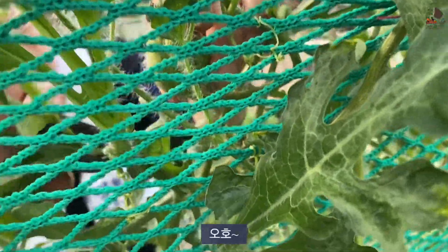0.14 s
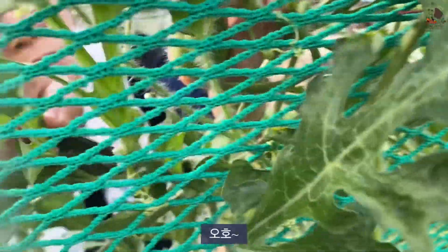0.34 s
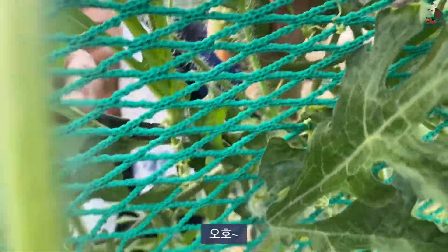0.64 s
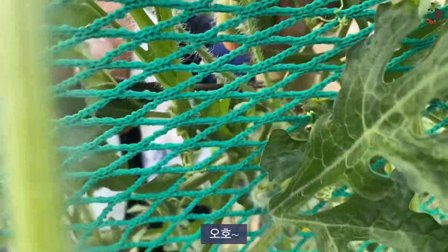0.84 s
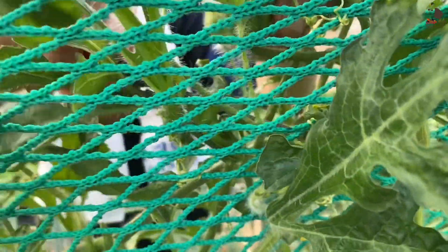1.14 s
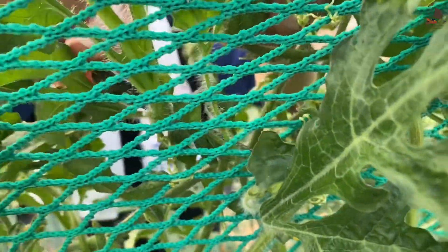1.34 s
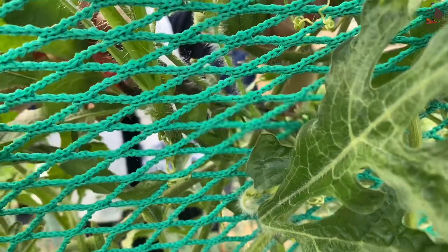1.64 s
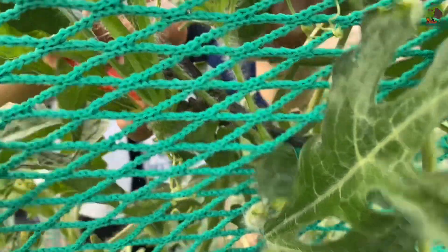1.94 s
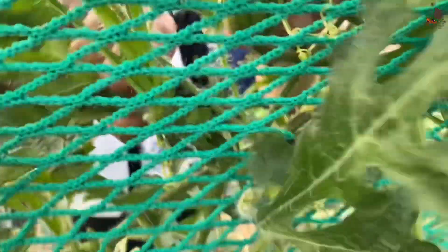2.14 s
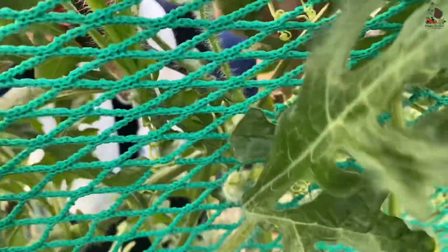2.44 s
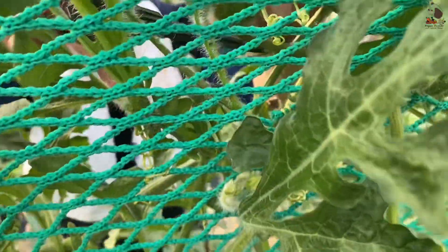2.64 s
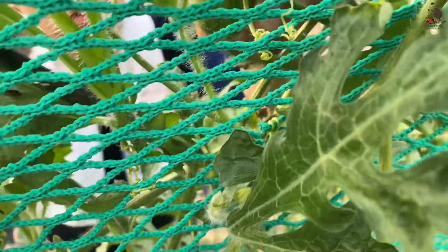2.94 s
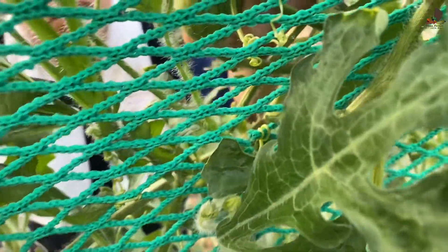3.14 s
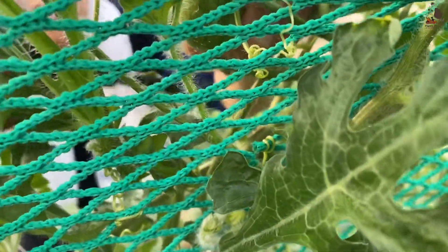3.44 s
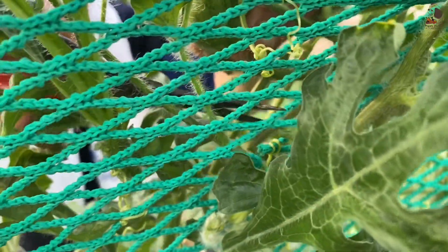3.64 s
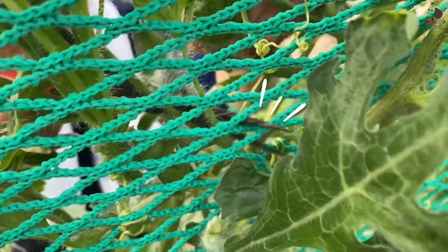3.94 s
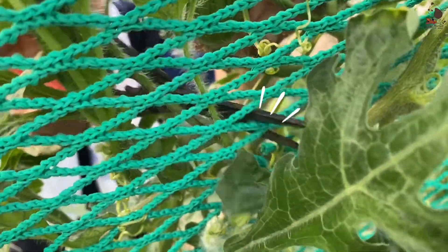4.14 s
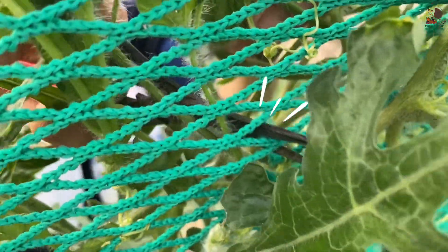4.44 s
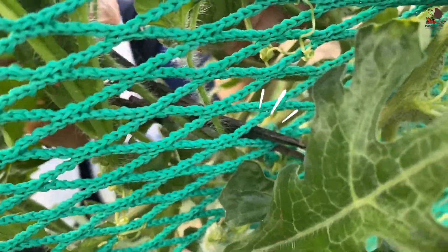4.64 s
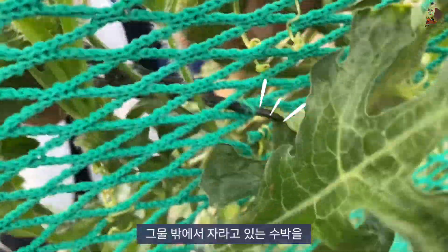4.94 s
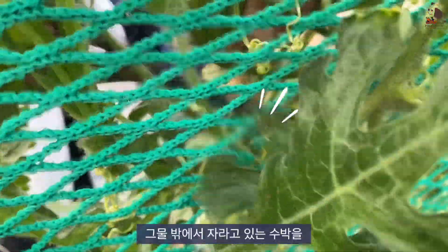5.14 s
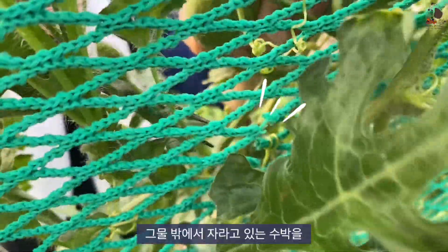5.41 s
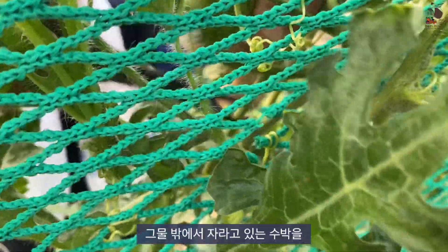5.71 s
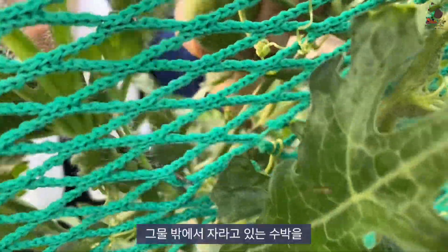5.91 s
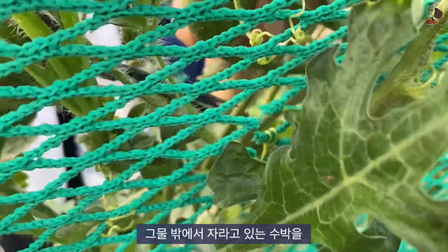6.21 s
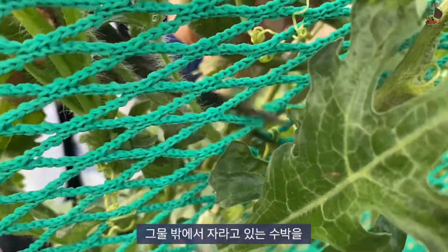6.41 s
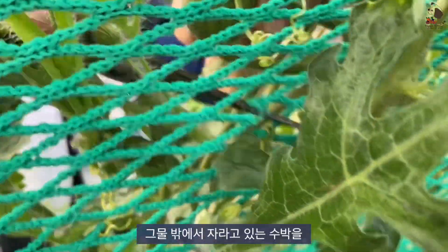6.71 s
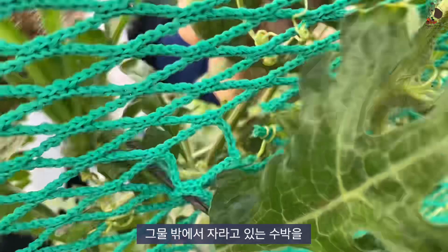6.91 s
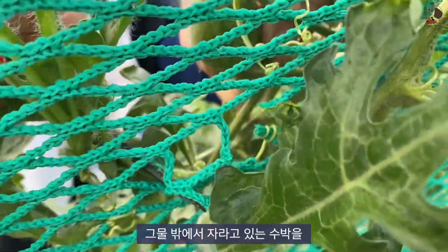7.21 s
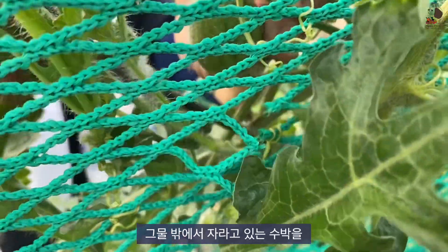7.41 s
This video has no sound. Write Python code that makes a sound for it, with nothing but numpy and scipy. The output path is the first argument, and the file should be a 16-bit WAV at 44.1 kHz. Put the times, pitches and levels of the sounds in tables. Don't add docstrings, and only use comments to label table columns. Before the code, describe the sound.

Close dry rustling in a netted hedge, with one crisp blade snip, a slowed heavier cut, small snaps and far bird chips.

```python
import sys
import numpy as np
from scipy import signal
from scipy.fft import rfft, irfft, next_fast_len
from scipy.io import wavfile
from scipy.ndimage import uniform_filter1d, minimum_filter1d

SR = 44100
rng = np.random.default_rng(int(sys.argv[2]) if len(sys.argv) > 2 else 0)


def boost_factor(decibels):
    exponent = np.asarray(decibels, float) / 20
    return 10 ** exponent


def to_wav(sig):
    pcm = np.clip(np.atleast_2d(sig), -1, 1) * 32767
    pcm = np.round(pcm).astype(np.int16)
    wavfile.write(sys.argv[1], SR, pcm.T)


N = 333611
FFT_SIZE = next_fast_len(N)
BIN_HZ = np.fft.rfftfreq(FFT_SIZE, 1 / SR)
TOP_HZ = 19500

# start, end in seconds.
SLOW_S = (3.788, 5.687)


def action_time(s):
    return s - (np.clip(s, *SLOW_S) - SLOW_S[0]) / 2


def speed_up(s):
    return 2 if SLOW_S[0] < s < SLOW_S[1] else 1


def curves(table):
    s, *columns = np.transpose(table)
    return [np.interp(np.arange(N) / SR, action_time(s), c) for c in columns]


def over_hz(table):
    hz, value = np.transpose(table)
    return np.interp(np.log(BIN_HZ + 1), np.log(hz + 1), value)


def shape(x, gain):
    return irfft(rfft(x, FFT_SIZE) * gain, FFT_SIZE)[..., :N]


def band(lo_hz, hi_hz, soft_hz):
    return (np.tanh((BIN_HZ - lo_hz) / soft_hz) - np.tanh((BIN_HZ - hi_hz) / soft_hz)) / 2


def unit(x):
    return x / np.sqrt(np.mean(x ** 2))


def smooth_twice(x, width):
    return uniform_filter1d(uniform_filter1d(x, width), width)


def walk(rate_hz):
    hold = int(SR / rate_hz)
    levels = np.repeat(rng.standard_normal(N // hold + 1), hold)
    return unit(smooth_twice(levels, hold)[:N])


# Hz, radians the left port leads.
PORTS_LEAD = [(0, 0), (450, .8), (750, 3), (1200, 1.5), (3270, 1.5), (4200, 0), (6500, .7), (7400, -.4),
              (8100, -2.6), (10400, -6.2), (20000, -21.8)]


def port_turn():
    return np.exp(.5j * np.interp(BIN_HZ, *np.transpose(PORTS_LEAD)))


def ports(x, pan_db):
    turn = port_turn()
    pan_db = pan_db - 0.64 * np.log2(np.clip(BIN_HZ, 2500, 10000) / 2500)
    return shape(x, np.array([turn * boost_factor(pan_db / 2), boost_factor(-pan_db / 2) / turn]))


# peak in seconds, level in dB, swell and fade in
# seconds per 10 dB, brightness in dB.
STROKES = [(0.0, -63, 0.125, 0.89, -1), (.332, -49.5, 0.093, 0.021, 0),
           (.41, -51.5, 0.032, 0.044, -3.5), (.604, -59, 0.098, 0.027, 0),
           (.688, -53.5, 0.049, 0.13, 2.5), (.95, -67, 0.46, 0.26, -8),
           (1.096, -57.5, 0.15, 0.044, -1), (1.248, -49, 0.041, 0.056, -0.5),
           (1.456, -57.5, 0.082, 0.11, -0.5), (1.588, -60, 0.027, 0.7, -3.5),
           (1.872, -53, 0.04, 0.05, 1), (2.008, -56, 0.0062, 0.048, 2),
           (2.116, -59, 0.053, 0.057, 1), (2.318, -54.5, 0.067, 0.1, -2),
           (2.478, -65, 0.088, 0.15, 0), (2.759, -60, 0.0226, 0.11, -4),
           (2.888, -58, 0.05, 1, -0.5), (3.052, -65, 0.2, 0.12, 1),
           (3.416, -52.5, 0.023, 0.14, 1.5), (3.554, -57, 0.44, 0.027, 0.5),
           (3.688, -52.5, 0.006, 0.062, 0), (3.801, -59.5, 0.011, 0.061, 2.5),
           (3.954, -57, 0.031, 0.31, -0.5), (4.112, -49, 0.083, 0.033, -0.5),
                   (4.208, -66, 0.025, 0.023, -12.5), (4.388, -47.5, 0.032, 0.07, 2.5),
                   (4.616, -46, 0.027, 0.13, 0), (4.718, -47, 0.22, 0.11, 0.5),
                   (5.029, -49, 0.084, 0.14, 0.5), (5.13, -48.5, 0.14, 0.11, -2.5),
                   (5.272, -54, .03, 0.12, -2.5), (5.614, -57, 0.096, 0.21, 1),
                   (5.804, -58, 0.12, 0.38, -2.5), (5.875, -47, 0.044, 0.027, -4),
                   (6.104, -56, 0.11, 0.0095, 7), (6.373, -99, 0.036, 0.18, -9),
                   (6.543, -54, 0.15, 0.146, -0.5), (6.61, -49.5, 0.0876, 0.2, 0.5),
                   (6.831, -46.5, 0.015, 0.0866, -4.5), (6.9, -52.5, 0.036, 0.098, 4),
                   (6.47, -53.5, 0.021, .1, -2), (7.1, -60.5, 0.085, 0.44, -1),
                   (7.312, -55, 0.072, 0.28, 0.5), (7.56, -61, 0.24, .1, -2)]
# body, hiss and air of the rub in dB.
REST_DB = (-79.5, -88, -94)
BODY_DB, AIR_DB = -5, 0
BODY_PER_BRIGHT, AIR_PER_BRIGHT = -1.2, 0.72


def strokes():
    t = np.arange(N) / SR
    power = boost_factor(2 * np.array(REST_DB))[:, None] + np.zeros(N)
    for s, db, swell_s, fade_s, bright_db in STROKES:
        late_s = (t - action_time(s)) * speed_up(s)
        shape_db = -10 * np.where(late_s < 0, -late_s / max(swell_s, 1e-3), late_s / max(fade_s, 1e-3))
        body_db = BODY_DB + BODY_PER_BRIGHT * bright_db
        air_db = AIR_DB + AIR_PER_BRIGHT * bright_db
        ranges_db = db + np.array([body_db, 0, air_db])
        power = power + boost_factor(2 * ranges_db)[:, None] * boost_factor(2 * np.maximum(shape_db, -100))
    return 10 * np.log10(power)


def crackle(per_s, spread_db, tail_s):
    sizes = boost_factor(spread_db * np.minimum(rng.exponential(size=N), 2.6))
    clicks = (rng.random(N) < per_s / SR) * sizes
    tail = np.exp(-np.arange(400) / (tail_s * SR))
    return unit(signal.fftconvolve(clicks, tail)[:N] * rng.standard_normal(N))


# Hz, density in dB per Hz.
RUB_COLOUR = [(350, -5.5), (700, -7), (1000, -5), (1200, -8), (1700, -10), (2300, -4.5), (2900, -4),
              (3600, -8.5), (4400, -6), (5500, -10), (7700, -3.5), (9000, -9), (11500, -1), (15000, -5),
              (19000, -8), (19900, -16)]


def rubbing():
    edges_hz = [(750, 2500), (2500, 9000), (9000, 20000)]
    shared = crackle(900., spread_db=4.0, tail_s=.0008)
    out = 0
    for (lo_hz, hi_hz), db in zip(edges_hz, strokes()):
        local = crackle(600., spread_db=4.0, tail_s=.0015)
        close = ports(shared + .7 * local, pan_db=1.2)
        hiss = boost_factor(4.4 * walk(40)) * rng.standard_normal((2, N))
        mix = shape(0.5 * close + .5 * hiss, boost_factor(over_hz(RUB_COLOUR)))
        steps_hz = np.geomspace(lo_hz, hi_hz, num=7)
        patches = 0
        for a, b in zip(steps_hz, steps_hz[1:]):
            patches = patches + shape(mix, band(a, b, a / 20)) * boost_factor(2.0 * walk(14))
        out = out + unit(patches) * boost_factor(db)
    return out


def bursts(events):
    crack, ring = np.zeros(N), np.zeros(N)
    t = np.arange(-400, 3000) / SR
    for s, db, hz, ring_db, t60_s, rise_s in events:
        k = speed_up(s)
        rise_s, t60_s = max(rise_s, 1e-4) / k, max(t60_s, 2e-3) / k
        fall = np.exp(-np.log(1000) * np.maximum(t, 0) / t60_s)
        envelope = np.where(t < 0, np.exp(t / rise_s), fall)
        at = max(int(action_time(s) * SR) - 400, 0)
        noise = rng.standard_normal((2, len(t)))
        waver = np.cumsum(uniform_filter1d(noise[1], size=24)) * 0.21 * min(hz * k / 1500, 1)
        size = boost_factor(db) / (1 + boost_factor(ring_db))
        crack[at:at + len(t)] += size * noise[0] * envelope * (0.56 + .5 * envelope ** 4)
        ring[at:at + len(t)] += size * boost_factor(ring_db) * envelope * np.sin(2 * np.pi * hz * k * t + waver)
    crack = shape(crack, boost_factor(over_hz(RUB_COLOUR) + 7.5) * band(900, TOP_HZ, 150.))
    tail = rng.standard_normal((2, 2500)) * np.exp(-np.arange(2500) / (.006 * SR))
    scatter = np.array([signal.fftconvolve(crack + ring, side)[:N] for side in tail])
    return ports(crack + ring, pan_db=1.0) + boost_factor(-33) * scatter


# start in seconds, peak in dB, ring in Hz, ring over crack in dB, t60 in seconds.
CUTS = [(2.0834, -39, 8160, 9, .021), (2.09, -28, 2430, 6, 0.028), (2.0948, -19, 1280, 6, 0.028),
        (2.095, -18.5, 4380, -4.5, 0.038), (2.0974, -24.5, 2850, 20, 0.04), (2.0999, -4.5, 8140, 10, 0.011),
        (2.1015, -19, 3535, 11, 0.027), (2.104, -27.5, 370, 40, 0.012), (2.114, -37, 2750, 6, 0.018),
        (2.109, -36, 3600, -2, 0.03), (4.644, -25.5, 1507, 10.5, 0.074), (4.649, -21, 1238, 16.5, 0.046),
        (4.6387, -29, 7300, -12, 0.072), (4.6453, -17.5, 2400, 1.5, 0.0667),
        (4.652, -21, 3470, -10.5, 0.036), (4.659, -33, 160, 41, 0.049), (4.672, -29.5, 340, 41, 0.066),
        (4.6507, -14.5, 7730, 18, 0.0096), (4.6532, -13, 2095, 22, 0.024), (4.6493, -16, 1500, -10, .008),
        (4.6682, -26, 3000, -8, .015), (4.658, -27, 1813, -21, 0.038), (4.6655, -20.5, 2003, 7, 0.02),
        (4.654, -24.5, 623, 26, 0.035), (4.6995, -28, 1910, 1.5, 0.034), (6.6648, -21, 7680, 7, 0.0076),
        (6.6643, -26.5, 2920, 7, 0.0093)]


def cuts():
    return bursts([(*row, 0.042 * row[-1]) for row in CUTS])


# start in seconds, peak in dB, ring in Hz, ring over crack in dB.
SNAPS = [(0.083, -51, 4000, -14), (1.026, -45, 7000, -16.5), (0.412, -38, 2100, -14), (.417, -39, 4800, -6),
         (.709, -44, 4500, -10), (6.358, -46, 2800, 0), (6.507, -44, 6000, -10), (6.585, -40, 6500, -8),
         (6.648, -36, 2600, -5), (6.853, -40, 2200, -8), (.567, -46, 7400, -8.5), (1.8358, -38, 3030, -1),
         (2.0074, -50, 8050, -7), (2.0607, -42, 2620, -14), (2.295, -38, 3900, -3), (2.758, -39.5, 4700, 0),
         (2.962, -33, 4500, -1.5), (3.42, -32, 7010, 4), (3.116, -41, 7050, -5), (3.246, -45, 2300, -4),
         (3.527, -46, 6000, -10), (3.547, -45, 6960, -10), (3.4283, -35, 4330, -7), (3.7233, -43, 4460, -6),
         (6.4501, -37.5, 6700, -8), (6.5665, -41, 2450, 1), (6.597, -37, 2340, 2), (6.8233, -34, 4000, 2),
         (6.83, -32, 2920, 3), (6.6216, -27.5, 4100, -3), (6.7417, -40, 7000, -13), (7.059, -42, 6390, -3),
         (7.2514, -43, 7360, -18.5), (7.457, -41, 4550, -8)]
MORE_SNAPS = [(3.798, -38.5, 5600, 19), (3.8182, -35.5, 5300, -7), (3.964, -52, 3970, -22),
              (4.201, -44.5, 1157, -20), (4.3278, -35, 8200, -3), (4.318, -46, 2300, 0), (4.264, -47, 5500, -8),
              (4.273, -47, 3800, 0), (4.403, -33, 7700, 3), (4.415, -36, 8000, -3), (4.2537, -48, 7800, 8),
              (4.283, -48, 7500, 0), (4.313, -43, 7900, 4), (4.351, -39.5, 2960, -5), (4.4548, -50, 7170, -2),
              (4.358, -31, 4050, 7), (4.377, -28, 7860, 10), (4.392, -24.5, 8000, 13), (4.5524, -36, 2080, -17),
              (4.8896, -38.5, 3583, -6), (4.99, -54, 3360, -2), (5.018, -33.5, 3000, 0), (5.1155, -20, 7600, 3),
              (5.1551, -36, 5480, 4), (5.202, -48, 1687, -28.5), (5.224, -37.5, 2200, 4)]
TEARS = [(1.2296, -27, 6620, -13, 0.035), (1.2358, -38, 1470, 10, 0.067), (3.685, -41, 7300, -9, 0.045),
         (4.6975, -26.5, 3590, 3, 0.042), (5.857, -29, 3330, -7, 0.026), (5.8636, -33, 2550, -27, 0.038),
         (6.641, -32.5, 2230, -12.5, 0.11), (6.682, -34, 2200, -7, 0.055), (6.813, -35.5, 7460, -11, 0.075),
         (6.8332, -31.5, 7300, -17.5, 0.071), (7.2887, -44, 7900, -11.5, 0.24)]
SNAP_T60_S, MORE_SNAP_T60_S = 0.013, 0.0226


def snaps_tears():
    events = [(*row, SNAP_T60_S) for row in SNAPS] + [(*row, MORE_SNAP_T60_S) for row in MORE_SNAPS] + TEARS
    return bursts([(s + .001, *row, .0002) for s, *row in events])


# start in seconds, peak in dB, ring in Hz.
TAPS = [(0.084, -48, 760), (0.136, -47, 1300), (0.146, -42, 821), (0.175, -50, 2030), (0.196, -49, 1300),
        (.231, -51, 1500), (0.215, -46.5, 751), (0.252, -48, 1036), (0.269, -47, 1490), (0.294, -48, 1200),
        (0.333, -51, 1290), (0.448, -51, 1210), (0.473, -49, 1140), (0.498, -58, 1340), (0.593, -47, 930),
        (0.702, -40, 730), (1.054, -50, 1255), (1.116, -46.5, 1640), (1.169, -53, 1130),
        (1.231, -34.5, 1300), (3.035, -52, 1530), (3.556, -39, 800), (3.59, -51, 1510), (3.687, -40, 822),
        (4.299, -65.5, 1230), (5.859, -31, 814), (6.833, -46, 1770), (6.994, -34, 680)]


def taps():
    return bursts([(s + .001, db + 7, hz, 15, .007, .0001) for s, db, hz in TAPS])


# start in seconds, peak in dB, ring in Hz.
KNOCKS = [
    (0.15, -53, 470),
    (0.706, -48, 384),
    (0.725, -42, 364),
    (4.288, -52, 284),
    (6.534, -46.5, 248),
    (6.619, -51, 403),
]


def knocks():
    return bursts([(s, db + 5, hz, 30, .04, .001) for s, db, hz in KNOCKS])


# start in seconds, length in seconds, start Hz, end Hz, level in dB.
SCRAPES = [(.71, .07, 2100, 2200, -65), (.81, 0.05, 2700, 2700, -64), (0.808, .07, 2350, 2150, -67),
           (.9, 0.18, 2150, 2350, -66), (0.837, 0.087, 995, 890, -61), (.9, 0.13, 3760, 3840, -68),
           (1.06, .06, 3600, 3700, -70), (2.752, .03, 2310, 2200, -67), (2.836, 0.059, 2500, 2300, -65),
           (3.147, 0.077, 4300, 4000, -68), (3.19, 0.11, 2400, 2190, -63), (3.207, 0.21, 1950, 2000, -68),
           (3.401, 0.18, 4350, 4500, -64), (3.44, .12, 2310, 2200, -64), (6.53, 0.092, 2450, 2350, -59),
           (5.92, .07, 2300, 2200, -64), (.3, .03, 2500, 2500, -62), (.22, .08, 4400, 4300, -61.5),
           (2.267, 0.105, 4200, 4000, -69), (6.6, .06, 3000, 2800, -58), (6.582, 0.033, 6500, 6000, -57),
           (6.623, 0.08, 2300, 2400, -55), (6.189, .12, 3600, 3500, -73)]
SCRAPE_WIDTH = .1


def scrapes():
    out, grain = np.zeros(N), boost_factor(3.0 * walk(90))
    for s, length_s, start_hz, end_hz, db in SCRAPES:
        u = np.linspace(0, 1, int(length_s * SR))
        wide = int(SR / (2 * SCRAPE_WIDTH * start_hz))
        noise = rng.standard_normal((2, 10000))
        shake = smooth_twice(noise, wide)[:, :len(u)]
        turn = 2 * np.pi * np.cumsum(start_hz + (end_hz - start_hz) * u) / SR
        turn = turn * speed_up(s)
        tone = unit(shake[0] * np.sin(turn) + shake[1] * np.cos(turn))
        at = int(action_time(s) * SR)
        out[at:at + len(u)] += boost_factor(db) * np.sin(np.pi * u) ** .5 * tone
    return ports(out * grain, pan_db=-1.0)


# start in seconds, length in seconds, top Hz, end minus start in Hz, level in dB.
CHIPS = [
    (2.773, 0.025, 2780, -30, -51.5),
    (2.8, 0.035, 1600, -100, -57),
    (2.814, 0.023, 2780, 0, -59),
    (6.364, 0.0163, 5750, 60, -56),
    (6.375, 0.027, 5270, 873, -47.5),
    (6.394, .016, 5000, -400, -54),
    (5.92, 0.024, 4130, -600, -56),
    (6.409, 0.016, 4012, 129, -56),
    (6.51, 0.0194, 2770, -100, -52),
]
CALLS_DEEP = [
    (2.877, 0.035, 5500, 900, -48),
    (2.909, 0.031, 4100, 100, -47.5),
    (2.89, 0.023, 5300, 0, -52),
    (2.915, .02, 4300, 0, -54),
    (2.2, .02, 1400, 198, -58),
]
ARCH, DEEP_ARCH = 0.0654, 0.19


def birds():
    out = np.zeros(N)
    calls = [(*row, ARCH) for row in CHIPS] + [(*row, DEEP_ARCH) for row in CALLS_DEEP]
    for s, length_s, top_hz, sweep_hz, db, arch in calls:
        middle_hz = top_hz * (1 - arch)
        start_hz, end_hz = middle_hz - sweep_hz / 2, middle_hz + sweep_hz / 2
        u = np.linspace(0, 1, int(length_s * SR))
        hz = np.interp(u, [0, .3, .55, 1], [start_hz, .97 * top_hz, top_hz, end_hz])
        hz = hz * (1 + .33 * uniform_filter1d(rng.standard_normal(len(u)), size=60))
        flutter_db = 11.1 * uniform_filter1d(rng.standard_normal(len(u)), size=150) * 3.4
        envelope = boost_factor(db - 2.0 + flutter_db) * np.sin(np.pi * u)
        at = int(action_time(s) * SR)
        out[at:at + len(u)] += envelope * np.sin(2 * np.pi * np.cumsum(hz) / SR)
    return ports(out, pan_db=4.0)


# Hz, density in dB per Hz.
RUMBLE_COLOUR = [(15, -47), (30, -32), (42, -5), (54, -16), (70, 0), (91, -1), (172, -9), (199, -13),
                 (230, -12), (307, -22), (376, -17), (461, -23), (616, -38), (800, -44), (1040, -67),
                 (1760, -120)]
# Hz, left-right likeness from 0 to 1.
RUMBLE_ALIKE = [(30, 0.84), (130, 0.96), (250, 0.95), (450, 0.4), (900, 0.2)]
# time in seconds, level in dB, dulling in dB.
ENGINES = [(0.0, -48.5, 0), (.44, -50.5, -1), (.86, -48.5, -0.5), (3.35, -49, 0.5), (3.75, -48, 1.5),
           (5.12, -49, 1.5), (5.43, -51, 4), (5.83, -48.5, 4.5), (6.4, -51, 0.5), (6.78, -50, -2),
           (7.56, -52.5, 2)]
# time in seconds, level in dB.
BREEZE = [(0.2, -65.5), (.86, -71), (1.3, -80), (2.65, -80), (3.35, -72.5), (3.75, -65), (4.19, -69.5),
          (5.12, -62), (5.43, -70), (5.83, -64), (6.4, -67.5), (6.78, -59.5), (7.12, -68.5), (7.56, -66.5)]


def rumble():
    alike = np.clip(over_hz(RUMBLE_ALIKE), 0, .99)
    colour = boost_factor(over_hz(RUMBLE_COLOUR))
    mid = unit(shape(rng.standard_normal(N), colour * np.sqrt(1 + alike)))
    side = unit(shape(rng.standard_normal(N), colour * np.sqrt(1 - alike)))
    firing_db = -5.5 + 1.5 * walk(5.)
    firing_hz = 85 + 2.5 * walk(8.)
    mid = mid + boost_factor(firing_db) * np.sin(2 * np.pi * np.cumsum(firing_hz) / SR)
    side = boost_factor(-8.5) * side
    both = np.array([(mid + side) * boost_factor(0.5), (mid - side) * boost_factor(2.5)])
    turn = port_turn()
    both = shape(both, np.array([turn, 1 / turn]))
    (engine_db, dull_db), (breeze_db,) = curves(ENGINES), curves(BREEZE)
    low = unit(shape(both, band(5, 300, 30.))) * boost_factor(engine_db)
    middle = unit(shape(both, band(300, 520, 30.))) * boost_factor(engine_db - 12.5 - dull_db)
    breeze = unit(shape(both, band(520, 900, 30.))) * boost_factor(breeze_db)
    return low + middle + breeze


# Hz, density in dB per Hz.
AIR_COLOUR = [(410, -41), (700, -8), (1200, -4.5), (2300, -7), (5790, -14), (7900, 1.5), (9230, -10),
              (9980, -27), (15500, -27.5)]


def air():
    rows = [row for row in AIR_COLOUR if 650 < row[0] < 16000]
    colour = boost_factor(over_hz(rows)) * band(500, TOP_HZ, 100.)
    return boost_factor(-66) * unit(shape(rng.standard_normal((2, N)), colour))


def scene():
    breaks = cuts() + snaps_tears() + taps() + knocks()
    return rubbing() + breaks + scrapes() + birds() + rumble() + air()


def frame_drops(frame, chance):
    gate = np.repeat(1. * (rng.random(N // frame + 1) < chance), frame)[:N]
    return uniform_filter1d(gate, size=400)


def low_pass(x):
    return signal.sosfilt(signal.butter(12, 16990, fs=SR, output="sos"), x)


# centre in Hz, least width in Hz, most width in Hz.
SEAMS = [
    (9050, 460, 1250),
    (13200, 640, 1450),
    (17500, 560, 900),
]
STARVED_S = [
    (4.234, 4.25),
    (4.276, 4.311),
]
HOLE_CHANCE, HOLE_WIDTH = .045, .045


def record(dry):
    treble = shape(dry.mean(axis=0), band(5000, TOP_HZ, 300.)) ** 2
    attack = uniform_filter1d(treble, size=100) > boost_factor(2 * 6.5) * uniform_filter1d(treble, size=2000)
    shut = uniform_filter1d(minimum_filter1d(1. - attack, size=1100), size=300)
    kept = shape(dry, band(-100, TOP_HZ, 40.))

    frame_s = np.arange(N // 1024 + 1) * 1024 / SR
    slowed = (frame_s > SLOW_S[0]) & (frame_s < action_time(SLOW_S[1]))
    rim_chance = np.where(slowed, .45, .9)
    for hz, least_hz, most_hz in SEAMS:
        core = band(hz - least_hz / 2, hz + least_hz / 2, 33.0)
        kept = kept - shut * shape(dry, core)
        for rim in (band(hz - most_hz / 2, hz, 30.), band(hz, hz + most_hz / 2, 30.)):
            kept = kept - shut * frame_drops(1024, rim_chance) * shape(dry, rim * (1 - core))

    for hz in np.geomspace(1500, 7500, num=12):
        hole = shape(dry, band(hz, hz * (1 + HOLE_WIDTH), 15.))
        kept = kept - shut * frame_drops(2048, HOLE_CHANCE) * hole

    lost_share = .65 * band(9000, SR, 600.) + .3 * band(17500, SR, 600.)
    for span_s in STARVED_S:
        a, b = (int(action_time(s) * SR) for s in span_s)
        fade = np.sin(np.linspace(0, np.pi, b - a)) ** .2
        kept[:, a:b] -= fade * shape(kept, lost_share)[:, a:b]

    start, end = (int(s * SR) for s in SLOW_S)
    resume = start + (end - start) // 2
    stretched = 2 * irfft(rfft(kept, FFT_SIZE), 2 * FFT_SIZE)
    slow = stretched[:, 2 * start:2 * start + end - start]
    played = np.concatenate([kept[:, :start], slow, kept[:, resume:resume + N - end]], axis=1)
    played = shape(played, 1 - (1 - boost_factor(-42)) * band(15900, SR, 40.))
    return low_pass(played)


dry = scene()
out = record(dry)
to_wav(out)
```